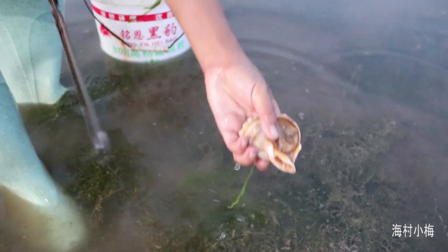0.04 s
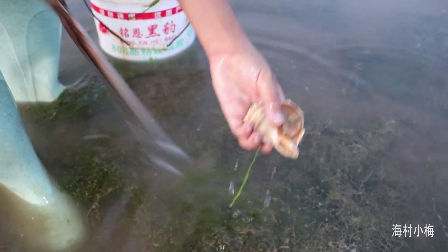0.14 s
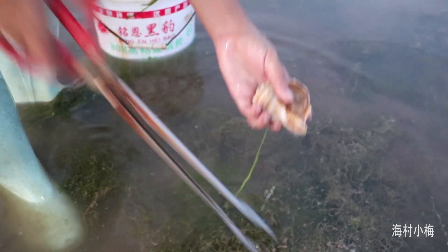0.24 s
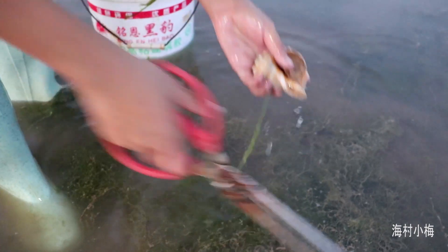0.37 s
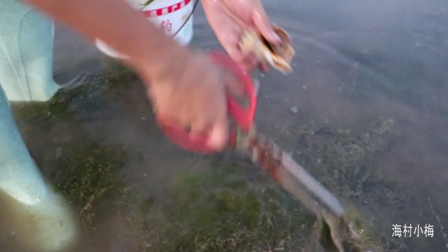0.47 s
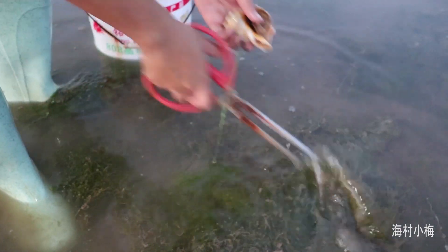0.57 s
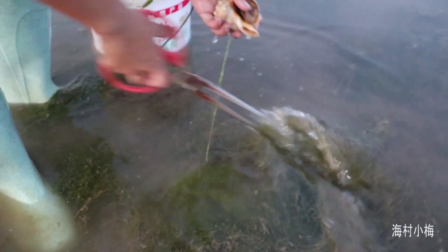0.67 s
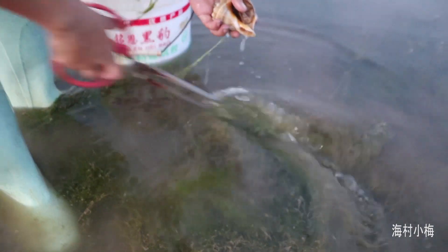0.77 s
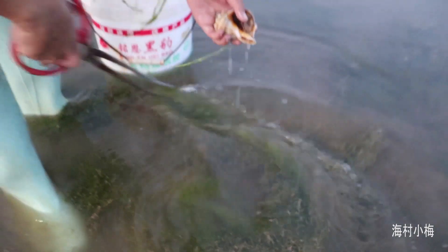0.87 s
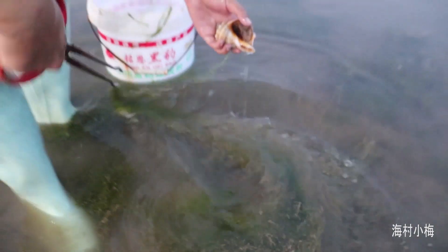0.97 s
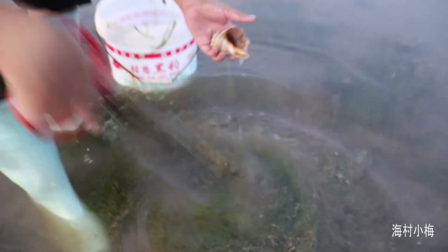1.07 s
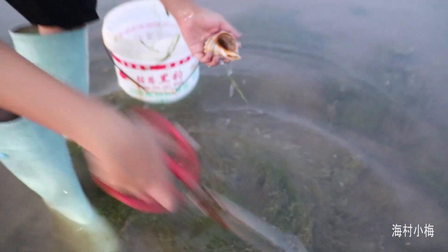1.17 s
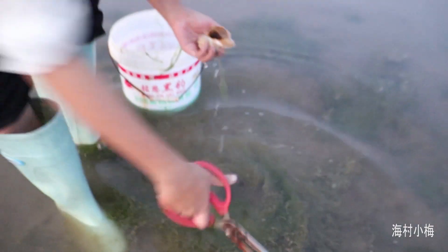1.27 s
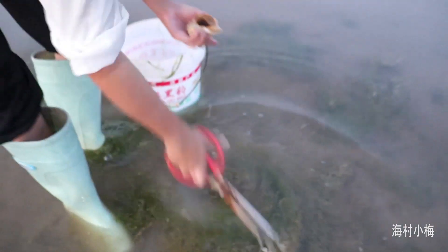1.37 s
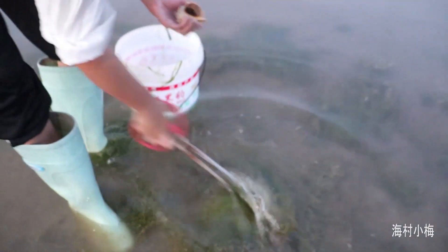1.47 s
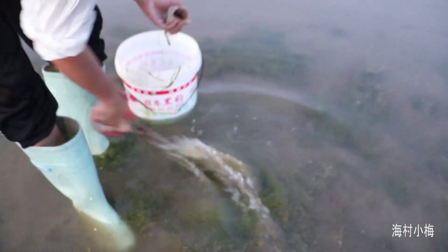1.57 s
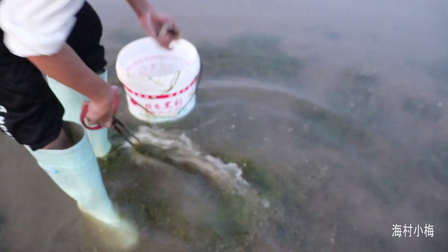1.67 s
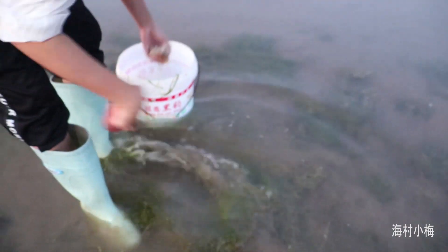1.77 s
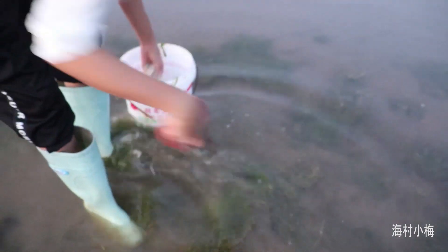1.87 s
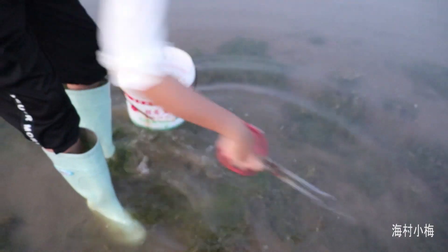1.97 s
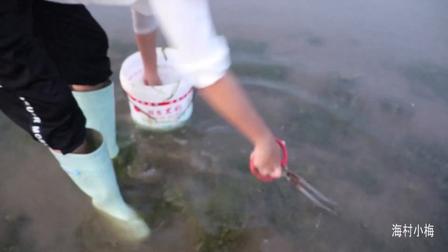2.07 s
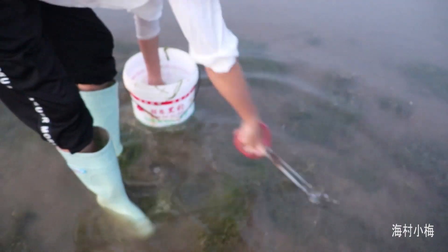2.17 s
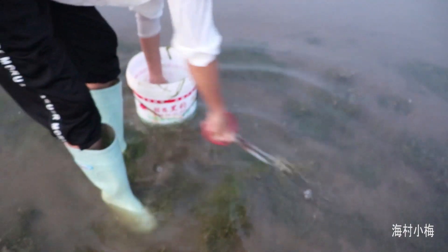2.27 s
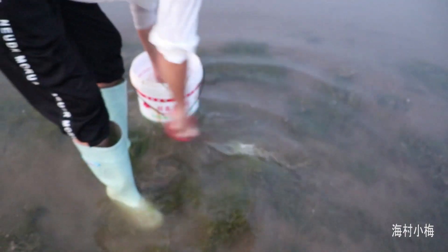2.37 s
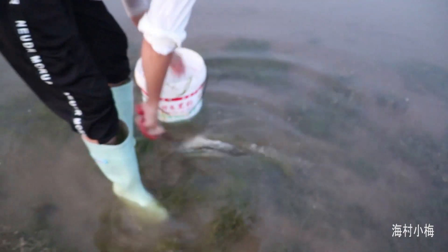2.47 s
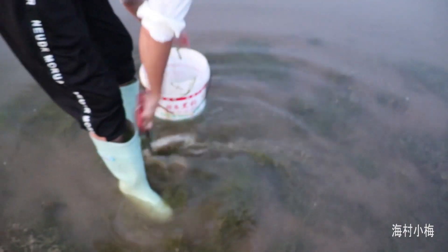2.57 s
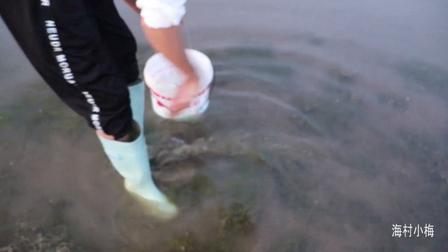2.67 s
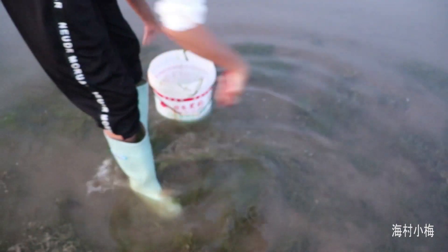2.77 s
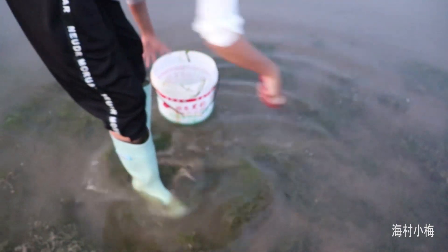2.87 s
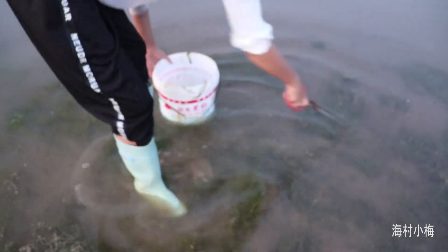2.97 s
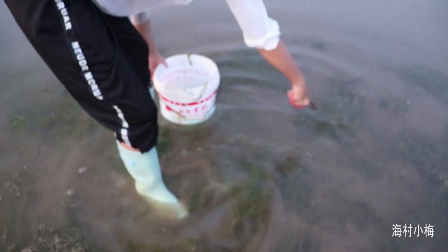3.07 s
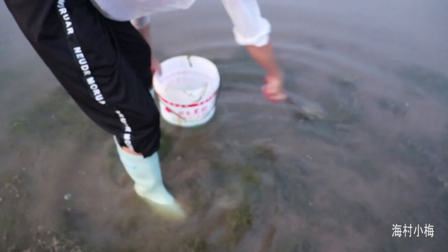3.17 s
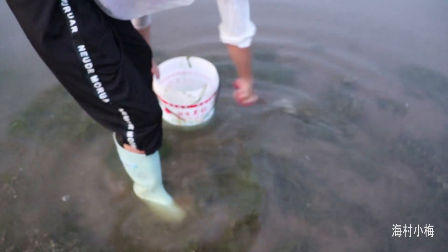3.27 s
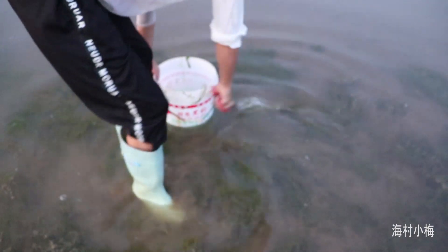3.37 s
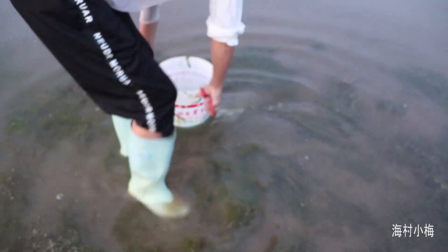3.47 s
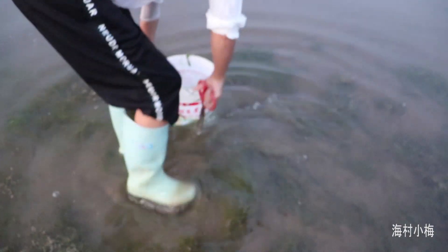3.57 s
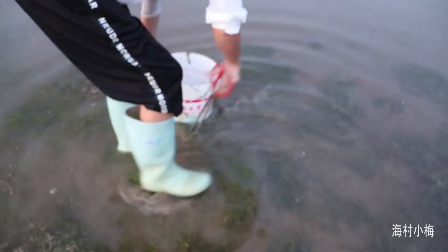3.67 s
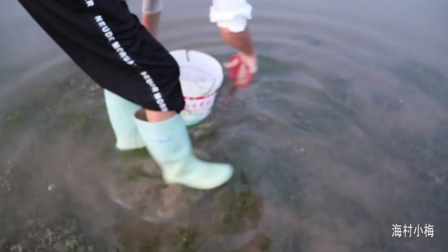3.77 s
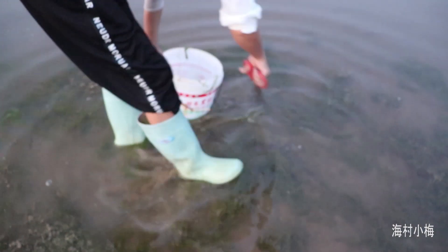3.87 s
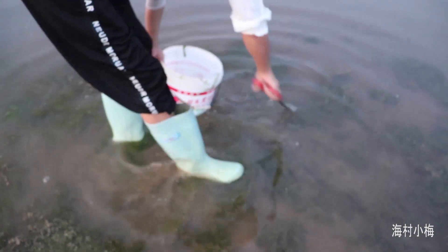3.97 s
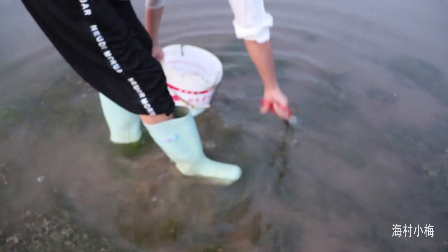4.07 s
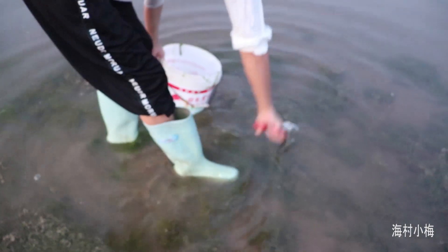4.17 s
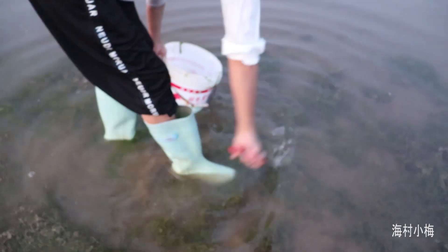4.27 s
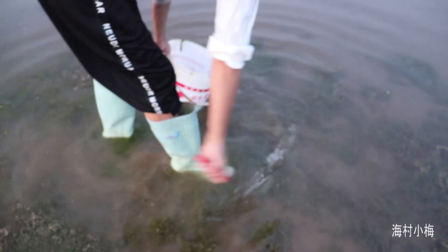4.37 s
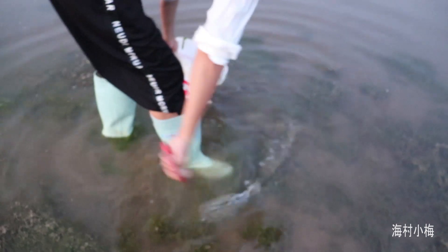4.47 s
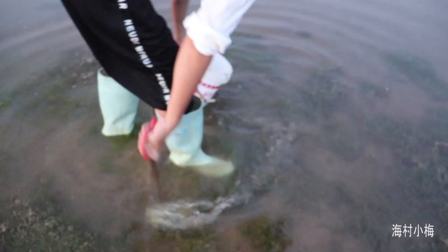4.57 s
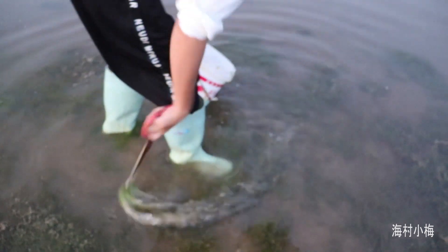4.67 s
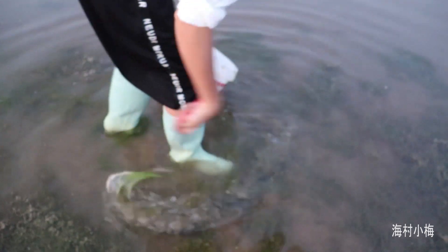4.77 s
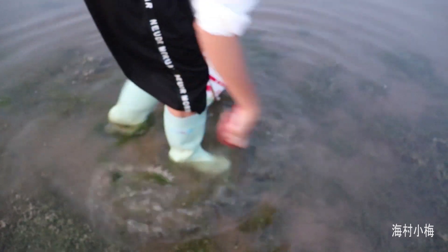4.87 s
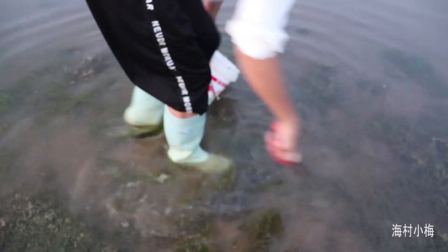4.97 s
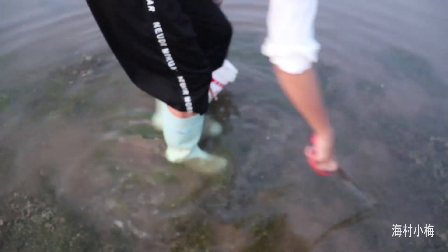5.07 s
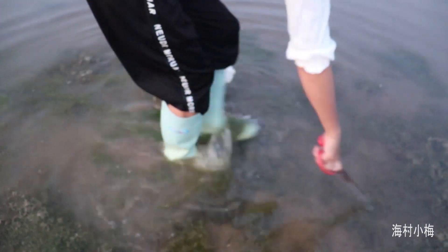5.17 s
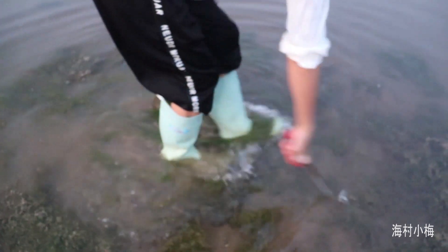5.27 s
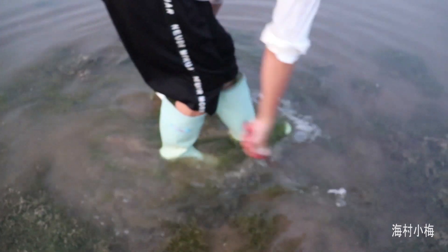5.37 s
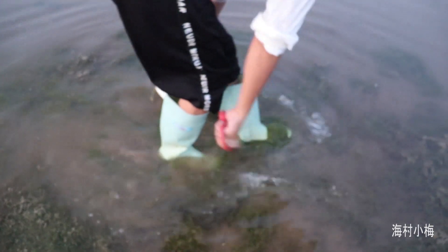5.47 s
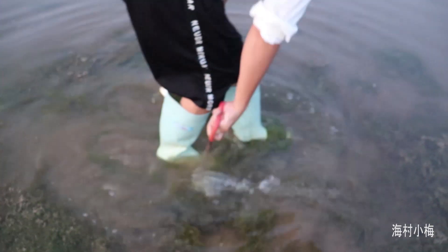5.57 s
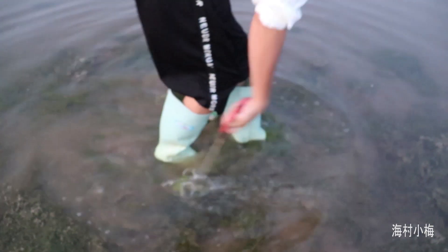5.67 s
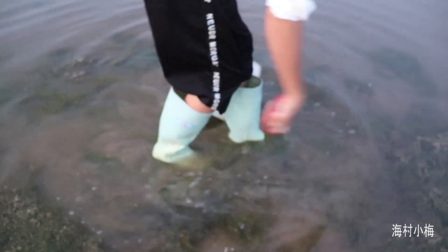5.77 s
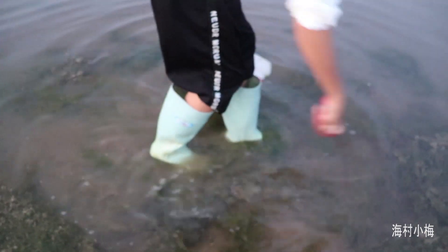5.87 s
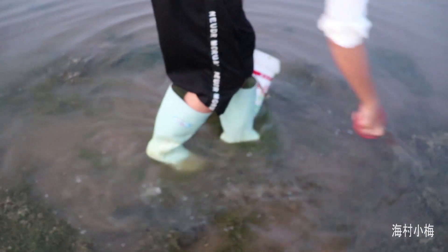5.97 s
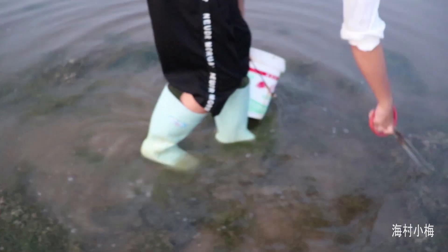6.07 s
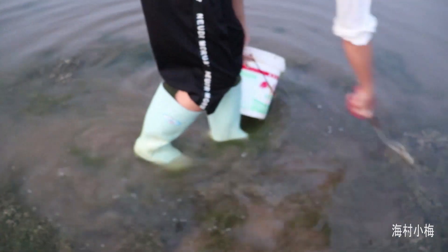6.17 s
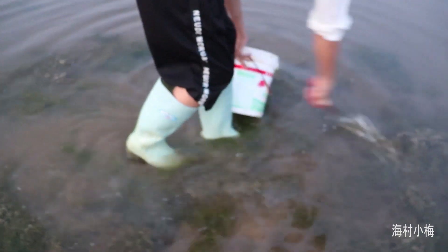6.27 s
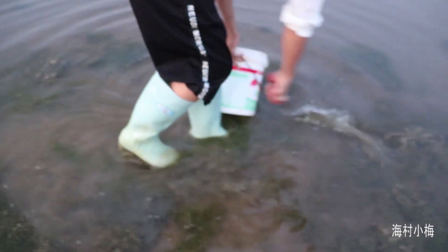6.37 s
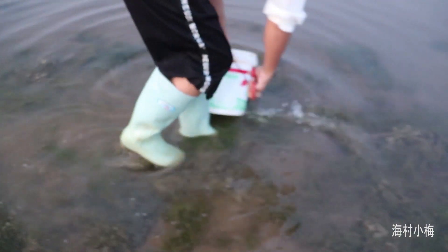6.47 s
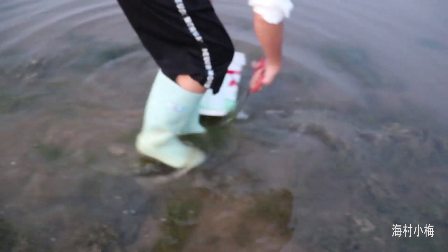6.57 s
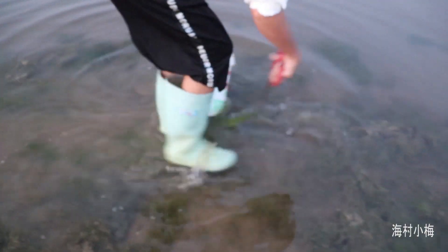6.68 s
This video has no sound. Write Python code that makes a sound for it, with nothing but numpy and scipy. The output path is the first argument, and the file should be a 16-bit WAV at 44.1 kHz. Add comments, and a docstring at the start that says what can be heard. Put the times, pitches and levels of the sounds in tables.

```python
"""First comes a soft rush of open air with a faint bird, then drips plop into ankle-deep seawater.
Someone in rubber boots wades over a tidal flat, sweeping steel tongs through the shallows.
Each sweep tears the surface into spray and traps air that rings as bubbles; drips fall back in between.
A shell knocks once into a plastic bucket, and a light wind rumbles on the microphone."""
import sys
import numpy as np
from scipy import signal
from scipy.io import wavfile

SR = 44100
rng = np.random.default_rng(int(sys.argv[2]) if len(sys.argv) > 2 else 0)


def digitize_waveform(pressure):
    """Quantize a signal to 16-bit integers and store it at the path in sys.argv[1].

    Rows of a 2-D input are taken as channels; values are limited to [-1, 1].
    """
    field = np.atleast_2d(pressure).T
    bounded = np.clip(field, -1, 1)
    quanta = np.round(bounded * 32767).astype(np.int16)
    wavfile.write(sys.argv[1], SR, quanta)


N = 297234
TIME = np.arange(N) / SR

# Levels in the tables are relative: the functions add gains of their own.
# sweeps of the tongs: t/s, time to full speed/s, length/s, swell/dB, easing off/dB,
# spray/dB, mist/dB, slosh/dB
TONG_SWEEPS = [(1.408, 0.09, 0.28, 18.5, 15.5, -26, -28.5, -32.5),
               (2.239, 0.054, 0.42, 13, 6, -30.5, -38, -36.5), (3.231, 0.18, 0.37, 4.5, 8, -36, -39, -37.5),
               (4.191, 0.13, 0.13, 5.5, 3.5, -39.5, -48, -36.5),
               (4.334, 0.2095, 0.285, 4.5, 5, -29, -40.5, -35),
               (5.289, 0.23, 0.32, 19, 5.5, -24, -38, -30.5), (6.332, 0.05, 0.19, 13, 6, -32.5, -37, -33.5)]
# the tips break the surface: t/s, length/s, level/dB
TIP_SPLATS = [(0.56, 0.01, -36), (0.584, 0.0076, -29.5), (1.389, 0.012, -26.5), (2.204, 0.02, -29.5),
              (2.367, 0.024, -29), (3.239, 0.011, -32), (3.47, 0.018, -30.5), (3.545, 0.02, -34.5),
              (4.336, 0.014, -34), (4.486, 0.008, -48), (6.369, 0.021, -33.5), (6.497, 0.004, -28.5)]
# thrown water rains back: t/s, length/s, slosh/dB, spray/dB
SHOWERS = [(0.487, 0.15, -47, -49.5), (0.793, 0.42, -45, -49), (1.596, 0.29, -27.5, -32),
           (2.722, 0.3, -38.5, -41), (3.598, 0.53, -37, -43.5), (4.589, 0.365, -35, -35.5),
           (5.611, 0.3, -38, -38.5), (6.584, 0.56, -40.5, -40)]
# a boot shifts and churns the water: t/s, length/s, slosh/dB, low rumble/dB
BOOT_STEPS = [(1.492, 0.17, -45.5, -41), (2.417, 0.12, -37.5, -37), (3.173, 0.32, -50, -45),
              (3.722, 0.15, -45, -39), (4.743, 0.053, -36.5, -56), (5.191, 0.079, -42.5, -42),
              (6.197, 0.3, -44.5, -55.5)]
# single ringing bubbles: t/s, level/dB, starting f/Hz, life/s
BIG_BUBBLES = [(0.4884, -33.5, 1266, 0.036), (0.5813, -25.5, 912, 0.027), (0.8824, -36.5, 1260, 0.038),
               (1.105, -34, 713, 0.074), (1.3962, -27, 1150, 0.021), (1.4136, -32, 418, 0.12),
               (1.568, -21.5, 1950, 0.01), (1.6133, -22, 854, 0.034), (1.629, -19.5, 785, 0.015),
               (1.82, -24.5, 1185, 0.013), (2.232, -23.5, 960, 0.023), (2.4235, -22, 556, 0.022),
               (2.4844, -21.5, 1490, 0.011), (2.787, -32.5, 2220, 0.028), (2.88, -31.5, 2600, 0.025),
               (2.9267, -20, 518, 0.0048), (3.6162, -35, 540, 0.084), (3.6214, -21.5, 1950, 0.0067),
               (3.717, -24, 1297, 0.022), (3.7888, -33, 452, 0.16), (4.204, -29, 914, 0.035),
               (4.612, -23.5, 1630, 0.017), (4.759, -32.5, 868, 0.047), (4.827, -26.5, 2927, 0.014),
               (5.2224, -21.5, 2660, 0.01), (5.3041, -31.5, 696, 0.03), (6.459, -24, 2936, 0.012)]
# big air pockets collapse with a low gulp: t/s, level/dB, f/Hz
AIR_POCKETS = [(2.4456, -18.5, 162), (2.717, -20.5, 198), (2.8677, -19.5, 185.6), (3.018, -23.5, 235),
               (3.808, -17, 215), (4.383, -13.5, 260), (4.3923, -24, 228), (5.2257, -16, 450)]
# drops slap the surface: t/s, level/dB, f/Hz
DROP_HITS = [(0.4907, -21, 1370), (0.554, -20.5, 2680), (0.679, -26, 7500), (0.8114, -22, 1970),
             (0.8836, -21, 1440), (0.979, -25.5, 1420), (1, -23, 2700), (1.3816, -15, 1770),
             (1.3922, -10.5, 1290), (1.605, -11.5, 1130), (1.743, -18, 3400), (1.801, -15.5, 2400),
             (1.8947, -16.5, 3590), (2.0524, -20, 3860), (2.2308, -14, 3800), (2.4239, -16.5, 1330),
             (3.431, -17, 2560), (3.6929, -15.5, 1410), (3.7848, -19.5, 4030), (3.887, -20, 3473),
             (4.0693, -21, 1334), (4.3347, -12, 2210), (4.8931, -15, 4980), (5.186, -20, 1021),
             (5.3824, -16.5, 3084), (5.5574, -14, 2303), (5.8807, -23.5, 2026), (6.477, -14.5, 2650)]
# the shell lands and bounces: t/s, level/dB
SHELL_HITS = [(2.3234, -15.5), (2.3258, -10), (2.329, -10)]
# tones of the bucket: f/Hz, level/dB, time to fade by 60 dB/s
BUCKET_TONES = [(580, -4.5, 0.047), (1450, -8.5, 0.029), (1520, 0.5, 0.023), (2390, -2, 0.017),
                (3670, -5.5, 0.017)]
# tones of the steel tongs: f/Hz, level/dB
TONG_TONES = [(1350, -1), (1640, 10.5), (2620, 10), (4190, 6), (4790, 0), (5530, 1.5), (8000, 4),
              (11920, 9.5)]
# the two bands where the finest spray sizzles: f/Hz
MIST_BANDS = [11100, 13840]

# A spectrum says how strong a sound is at each pitch, low to high.
# the tearing surface: f/Hz, level/dB
TEAR_SPECTRUM = [(1200, -23), (2500, 0), (4500, 0.5), (7000, 1.5), (11000, -1), (14000, -8), (16000, -15)]
# bubbles trapped by a sweep: f/Hz, level/dB
GURGLE_SPECTRUM = [(1200, 0), (2600, -1), (4500, -7)]
# churned water: f/Hz, level/dB
SLOSH_SPECTRUM = [(100, -3.5), (250, -3), (500, -6), (1300, 1.5), (2600, -4.5), (5000, -10.5)]
# small droplets: f/Hz, level/dB
DROPLET_SPECTRUM = [(1200, -13), (3000, -2), (5000, -5), (9000, -6), (15000, -22.5)]
# wind on the microphone: f/Hz, level/dB
WIND_SPECTRUM = [(20, -17), (45, -3), (65, 4.5), (120, -4), (250, -3), (600, -35)]
# air over the open flat: f/Hz, level/dB
AIR_SPECTRUM = [(60, -7), (130, 5.5), (300, 2.5), (1000, -5.5), (3000, -14.5), (8000, -16.5),
                (16000, -28.5)]

SLOSH_FOLLOWS = 0.11   # share of a sweep's swell that the slosh follows
CUTOFF_HZ = 16000
LEFT_RIGHT = np.array([[1], [-1]])   # adds on the left, subtracts on the right


def swish(level_db, mist_db, bursts_per_s=260, burst_s=0.0027, mist_q=14, tong_q=35):
    """A sweep tears the water into hiss, bubbles and mist, and sets the tongs ringing."""
    spurts = from_db(2.5 * drift(55))
    torn = banded_noise(TEAR_SPECTRUM, patchy_db=3.5, flutter=35, width=0)
    collapses = (rng.random(N) < bursts_per_s / SR) * rng.random(N)
    bursts = rms_one(fade_tail(collapses, burst_s))
    crackle = .7 * bursts * banded_noise(DROPLET_SPECTRUM, patchy_db=5, flutter=90, width=0)
    hiss = from_db(level_db - 2.5) * (spurts * torn + crackle)
    gurgle = swarm(level_db - 4, GURGLE_SPECTRUM, per_s=240, cycles=38, spread_db=13,
                   crowding=.5, rise=.3)
    white = rng.standard_normal((2, N))
    # a higher q makes a narrower band
    mist = sum(band(white, hz - hz / mist_q / 2, hz + hz / mist_q / 2) for hz in MIST_BANDS)
    ringing = sum(from_db(db) * signal.lfilter(*signal.iirpeak(hz, tong_q, fs=SR), hiss)
                  for hz, db in TONG_TONES)
    return hiss + gurgle + ringing + from_db(mist_db) * spurts * rms_one(mist)


def slosh(level_db):
    """Churned water gurgles with bubbles over a soft wash."""
    gurgle = swarm(level_db - 1, SLOSH_SPECTRUM, per_s=1000, cycles=24, spread_db=17,
                   crowding=.55, rise=.4)
    wash = banded_noise(SLOSH_SPECTRUM, patchy_db=10, flutter=70, width=0)
    return gurgle + from_db(level_db - 11.5) * wash


def spray(level_db):
    """Droplets tick on the water over a faint fizz."""
    patter = swarm(level_db - 1.5, DROPLET_SPECTRUM, per_s=900, cycles=14, spread_db=21,
                   crowding=.6, rise=.25)
    fizz = banded_noise(DROPLET_SPECTRUM, patchy_db=7, flutter=140, width=0.1)
    return patter + from_db(level_db - 4) * fizz


def water_levels(still_db=-76):
    """How loud slosh, spray, swish and mist are, in dB, as tongs sweep, water falls and boots shift."""
    sloshes, sprays, swishes, mists = ([from_db(still_db)] for _ in range(4))
    for start, speed_up, length, swell_db, ease_db, spray_db, mist_db, slosh_db in TONG_SWEEPS:
        speed_db = sweep_db(start, speed_up, length, swell_db, ease_db)
        stroke = gate(start, length)
        # a sweep sheds fewer bubbles and droplets than falling water
        sloshes += [stroke * from_db(slosh_db - 3 + SLOSH_FOLLOWS * speed_db)]
        sprays += [stroke * from_db(spray_db - 5.5 + speed_db)]
        swishes += [stroke * from_db(spray_db + speed_db)]
        mists += [stroke * from_db(mist_db + speed_db)]
    for start, length, slosh_db, spray_db in SHOWERS:
        rain = shower(start, length)
        sloshes += [rain * from_db(slosh_db)]
        sprays += [rain * from_db(spray_db)]
    swishes += [gate(start, length, fade_db_per_s=1100) * from_db(db) for start, length, db in TIP_SPLATS]
    sloshes += [gate(start, length) * from_db(db) for start, length, db, _ in BOOT_STEPS]
    layers = sloshes, sprays, swishes, mists
    return [10 * np.log10(sum(part ** 2 for part in layer)) for layer in layers]


def sweep_db(start, speed_up, length, swell_db, ease_db):
    """The sound swells as the tongs speed up and drops as they ease off."""
    return np.interp(TIME, [start, start + min(speed_up, length), start + length], [-swell_db, 0, -ease_db])


def shower(start, length, thinning_db=5.5, trickle_db=-20.5, trickle_db_per_s=5.5):
    """Thrown water lands all at once, thins out and ends in a slowly dying trickle."""
    t = np.maximum(TIME - start, 0)
    downpour = gate(start, length) * from_db(-thinning_db * np.minimum(t / length, 1))
    trickle = (t > 0) * from_db(trickle_db - trickle_db_per_s * t)
    return np.maximum(downpour, trickle)


def furrow(base_hz=793, width_hz=245):
    """The air channel behind the tongs rings hollowly, arching up an octave and back in each sweep."""
    wobble = signal.sosfilt(signal.butter(2, width_hz / 2, fs=SR, output="sos"), rng.standard_normal((2, N)))
    cos_part, sin_part = rms_one(wobble * from_db(5 * drift(60)))
    stray_octaves = .14 * drift(45)
    out = 0
    for start, speed_up, length, swell_db, ease_db, _, _, slosh_db in TONG_SWEEPS:
        pitch = base_hz * 2 ** (arch(start, length) + stray_octaves)
        phase = 2 * np.pi * np.cumsum(pitch) / SR
        speed_db = sweep_db(start, speed_up, length, swell_db, ease_db)
        level = gate(start, length) * from_db(slosh_db - 5.5 + SLOSH_FOLLOWS * speed_db)
        out = out + level * (cos_part * np.cos(phase) + sin_part * np.sin(phase))
    return out


def plops(octaves_per_s=24, gulp_cycles=2):
    """Large bubbles climb in pitch as they ring; the biggest air pockets give only a short gulp."""
    singing = [(s, db, hz, life, octaves_per_s * life) for s, db, hz, life in BIG_BUBBLES]
    gulping = [(s, db, hz, gulp_cycles / hz, 0) for s, db, hz in AIR_POCKETS]
    return from_db(6.5) * bubbles(singing + gulping)


def slaps(cycles=13, min_ring_s=0.002, splash_db=-14, splash_s=0.005, crack_db=28):
    """A drop hits with a crack, a tiny splash and a short ring; two smaller bubbles follow."""
    s, db, hz = np.transpose(DROP_HITS)
    hits = np.zeros(N)
    hits[(s * SR).astype(int)] = from_db(db + splash_db)
    splash = fade_tail(hits, splash_s) * rng.standard_normal(N)
    rings = bubbles(np.c_[s, db, hz, cycles / hz + min_ring_s, .5 * rng.random(len(s))])
    for late, smaller in rng.random((len(s), 2, 2)).transpose(1, 2, 0):
        small_hz = np.minimum(hz * (1.26 + 1.21 * smaller), CUTOFF_HZ / 2)
        life = cycles / small_hz + min_ring_s
        rings += bubbles(np.c_[s + 0.003 * late, db - 8, small_hz, life, np.zeros(len(s))])
    return rings + band(splash + from_db(crack_db) * hits, 900, 5000, order=1)


def bucket():
    """The shell strikes the plastic wall, and the water quickly stills the ringing."""
    clicks = np.zeros(N)
    for s, db in SHELL_HITS:
        clicks[int(s * SR)] = from_db(db)
    return sum(from_db(db) * ring(clicks, hz, fade_s) for hz, db, fade_s in BUCKET_TONES)


def glide(start_s=6.168, length_s=0.16, level_db=-32.5, low_hz=400, high_hz=1400):
    """One smooth glide parts the water with a dull swish and traps no air."""
    rush = band(rng.standard_normal(N), low_hz, high_hz, order=1)
    dull = signal.lfilter(*signal.butter(1, 2 * high_hz, fs=SR), rush)
    return from_db(level_db) * arch(start_s, length_s) * rms_one(dull)


def boots(low_hz=75, high_hz=200):
    """A moving boot shoves the water aside with a low rumble."""
    level = sum(gate(start, length) * from_db(db) for start, length, _, db in BOOT_STEPS)
    mid, side = band(rng.standard_normal((2, N)), low_hz, high_hz)
    return level * from_db(3 * drift(30)) * rms_one(mid + .5 * side * LEFT_RIGHT)


def wind(peak_s=2.48, gust_db=-37, build_db_per_s=3.5, die_db_per_s=38, breeze_db=-85):
    """One lumpy gust builds on the microphone, then dies down to a light breeze."""
    t = TIME - peak_s
    level_db = np.maximum(breeze_db, gust_db + np.minimum(build_db_per_s * t, -die_db_per_s * t))
    level = from_db(level_db + 2.5 * drift(25))
    return level * banded_noise(WIND_SPECTRUM, patchy_db=2, flutter=14, width=.9)


def open_air(level_db=-45.5):
    """Air rushes evenly over the open flat."""
    return from_db(level_db) * banded_noise(AIR_SPECTRUM, patchy_db=1.2, flutter=10, width=.5)


def bird(hz=6000, fall_hz=550, per_s=12, level_db=-59, end_s=2.3):
    """A faint, far-off bird repeats quick falling notes."""
    note = np.cumsum(per_s + drift(per_s)) / SR % 1   # runs from 0 to 1 in each note
    pitch = hz + fall_hz * (.5 - note + 0.067 * drift(per_s))
    level = from_db(level_db) * (TIME < end_s)
    return level * np.sin(np.pi * note) * np.sin(2 * np.pi * np.cumsum(pitch) / SR)


def bubbles(rows, lag_s=2.6e-5, pan_db=2.5, wobble_hz=34800):
    """Trapped air rings, rising in pitch near the surface. Rows: t/s, level/dB, f/Hz, life/s, rise/octaves."""
    out = np.zeros((2, N + SR))
    jostle = rng.standard_normal(N + SR)
    directions = rng.standard_normal((len(rows), 2))
    for (s, db, hz, life, rise), (lag, pan) in zip(rows, directions):
        t = np.arange(0, life, 1 / SR)
        span = slice(int(s * SR), int(s * SR) + len(t))
        age = t / life
        pitch = hz * 2 ** (rise * age ** 2)
        swell = np.exp(-2 * age) * (1 - age) * (1 - np.exp(-np.pi * hz * t))
        wobble = hz / wobble_hz * np.cumsum(jostle[span])   # smaller bubbles wobble more
        phase = wobble + 2 * np.pi * (np.cumsum(pitch) / SR + hz * lag * lag_s * LEFT_RIGHT)
        out[:, span] += from_db(db + pan * pan_db * LEFT_RIGHT) * swell * np.sin(phase)
    return out[:, :N]


def swarm(level_db, spectrum, per_s, cycles, spread_db, crowding, rise):
    """A crowd of random bubbles: harder stirring makes more of them, and louder ones."""
    rate = per_s * from_db(crowding * (level_db - level_db.max()))
    born = np.flatnonzero(rng.random(N) < rate / SR)
    pick, size, length, lift = rng.random((N, 4))[born].T
    pitches = np.geomspace(spectrum[0][0], spectrum[-1][0])
    share = np.cumsum(pitches * from_db(at_hz(spectrum, pitches)) ** 2)
    hz = np.interp(pick, share / share[-1], pitches)
    life = cycles / (hz + 500) * 2 ** (2 * length - 1)   # big pockets burst after fewer cycles
    strength = rms_one(from_db(spread_db * size ** 2))   # many quiet, few loud
    height = from_db(level_db[born]) * strength * 4 / np.sqrt(rate[born] * life)
    octaves = rise * lift * (2 * hz < CUTOFF_HZ)
    return bubbles(np.c_[born / SR, 20 * np.log10(height), hz, life, octaves])


def banded_noise(spectrum, patchy_db, flutter, width):
    """Stereo noise in half-octave bands that each flicker; the high ones spread wider."""
    out = 0
    edges = 22 * 2 ** np.arange(0, 9.6, .5)
    white = rng.standard_normal((2, 2, N))
    for k, (low, high) in enumerate(zip(edges, edges[1:])):
        if high < spectrum[0][0] or low > spectrum[-1][0]:
            continue
        mid, side = band(white[k % 2], low, high)
        hz = np.sqrt(low * high)
        apart = min(1, width + hz / 11000)
        level = from_db(at_hz(spectrum, hz) + patchy_db * drift(flutter))
        out = out + level * (mid + apart * side * LEFT_RIGHT)
    return rms_one(out)


def gate(start, hold, attack_s=0.0024, fade_db_per_s=391):
    """Water is stirred at once, stays so for a moment and settles quickly."""
    t = TIME - start
    return np.clip(t / attack_s, 0, 1) * from_db(-fade_db_per_s * np.maximum(t - hold, 0))


def arch(start, length):
    """A smooth rise from 0 to 1 and back."""
    return np.sin(np.pi * np.clip((TIME - start) / length, 0, 1))


def ring(clicks, hz, fade_s):
    """Each click starts a tone that fades by 60 dB in fade_s."""
    decay, turn = from_db(-60 / (fade_s * SR)), 2 * np.pi * hz / SR
    return signal.lfilter([0, np.sin(turn)], [1, -2 * decay * np.cos(turn), decay ** 2], clicks + 1e-18)


def fade_tail(clicks, tail_s):
    """Gives each click a fading tail."""
    return signal.lfilter([1], [1, -np.exp(-1 / (tail_s * SR))], clicks + 1e-18)


def band(x, low_hz, high_hz, order=2):
    """Keeps the sound between two pitches."""
    return signal.sosfilt(signal.butter(order, [low_hz, high_hz], "band", fs=SR, output="sos"), x)


def drift(rate):
    """A random wander that picks a new goal rate times a second."""
    return rms_one(np.interp(TIME * rate, np.arange(N), rng.random(N) - .5))


def at_hz(spectrum, hz):
    """Reads a spectrum's level at a pitch."""
    pitches, db = np.transpose(spectrum)
    return np.interp(np.log(hz), np.log(pitches), db)


def rms_one(x):
    """Scales a signal to an average strength (rms) of 1."""
    return x / np.sqrt(np.mean(x ** 2))


def from_db(db):
    """Turns decibels into a multiplier."""
    return 10 ** (np.asarray(db) / 20)


def scene():
    """Adds up the water, the bucket and the background."""
    slosh_db, spray_db, swish_db, mist_db = water_levels()
    water = slosh(slosh_db) + spray(spray_db) + swish(swish_db, mist_db)
    water = water + furrow() + glide() + plops() + slaps() + boots()
    return water + bucket() + wind() + open_air() + bird()


def record(dry):
    """Cuts off the highest treble steeply."""
    return signal.sosfilt(signal.ellip(10, .3, 75, CUTOFF_HZ, fs=SR, output="sos"), dry)


dry = scene()
out = record(dry)
digitize_waveform(out)
```